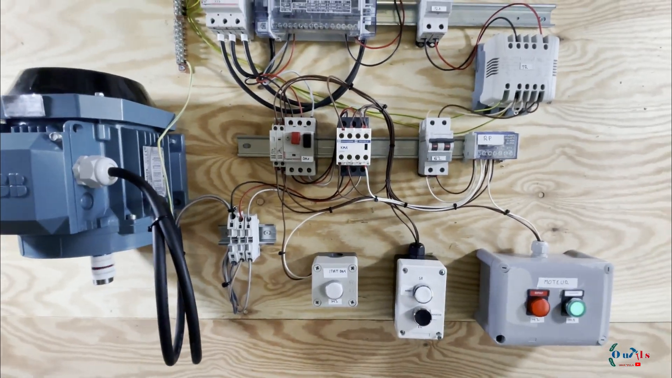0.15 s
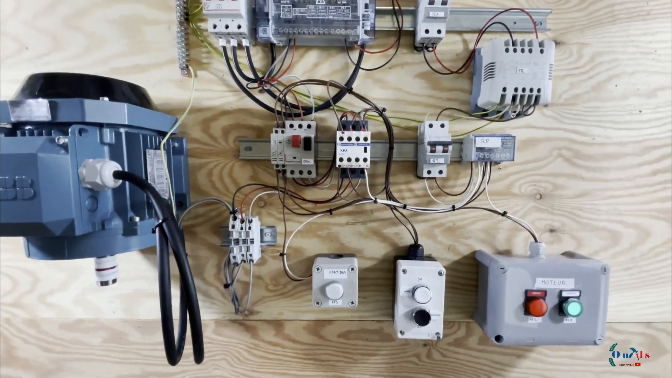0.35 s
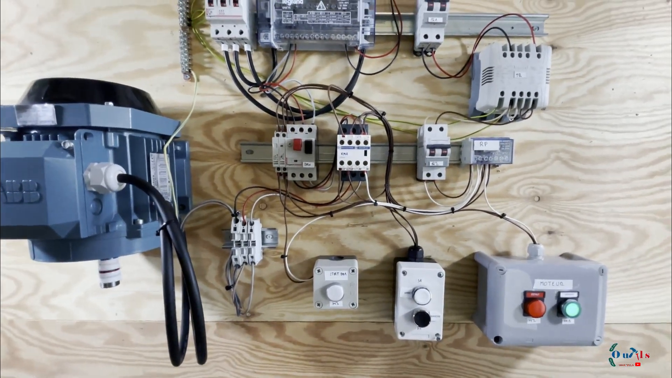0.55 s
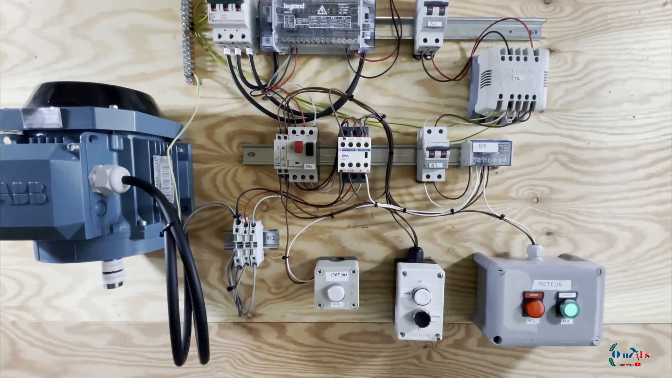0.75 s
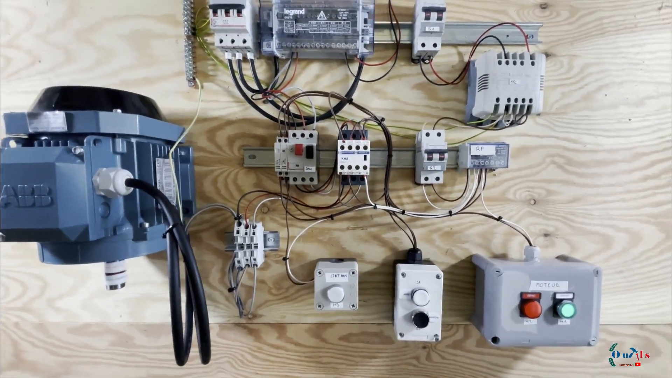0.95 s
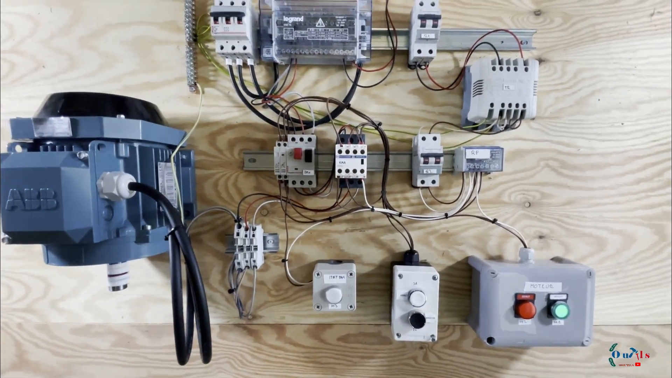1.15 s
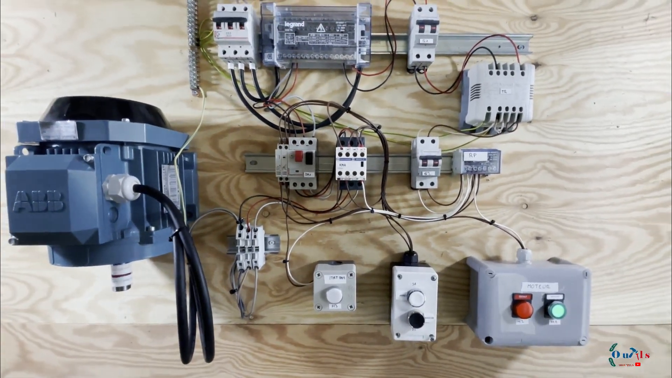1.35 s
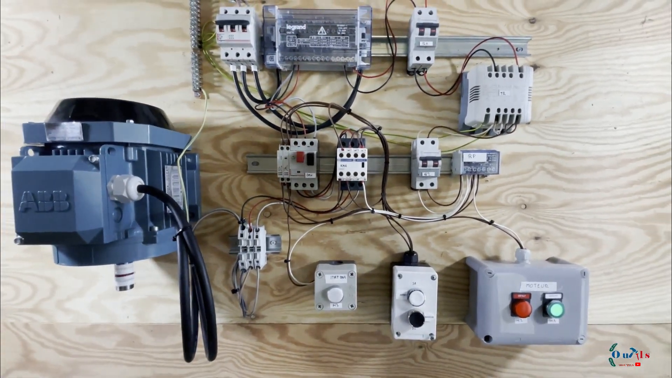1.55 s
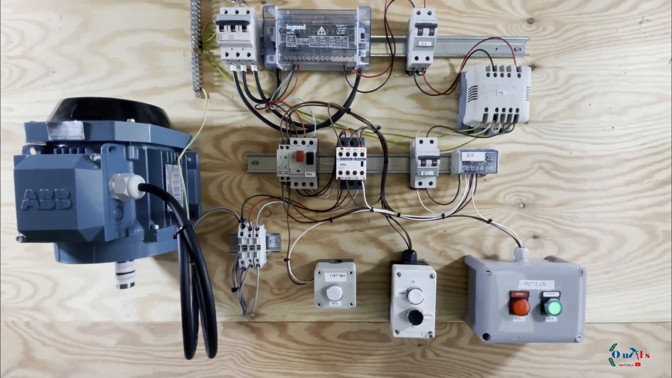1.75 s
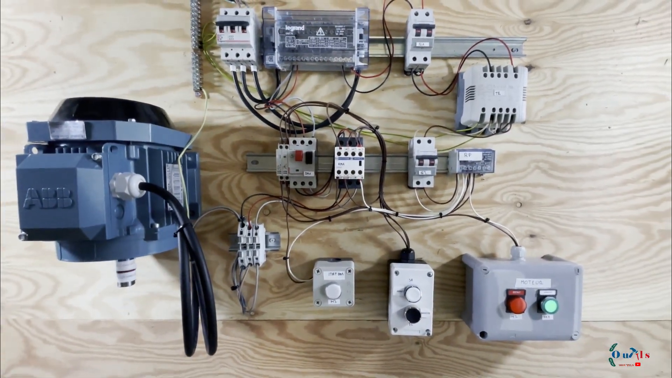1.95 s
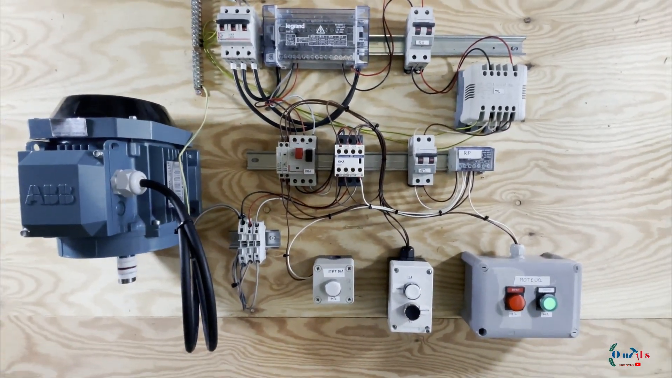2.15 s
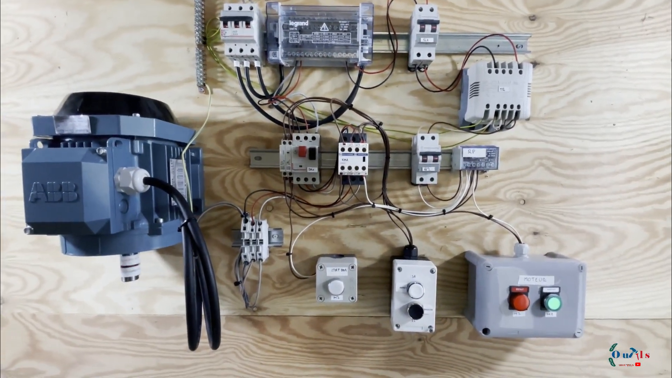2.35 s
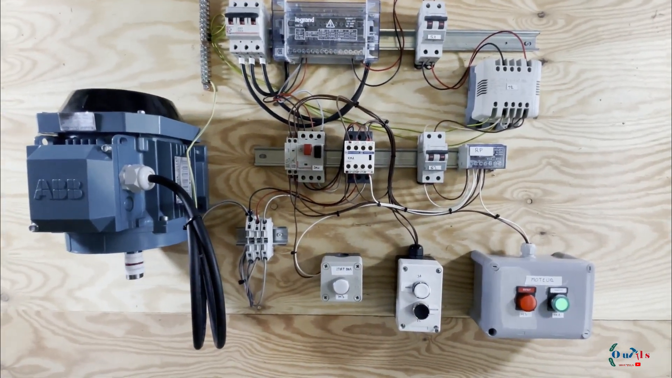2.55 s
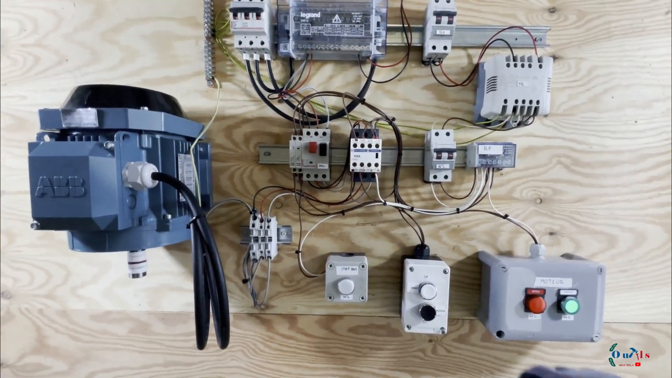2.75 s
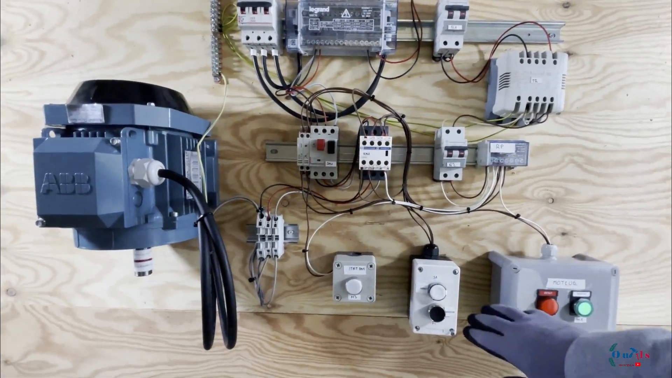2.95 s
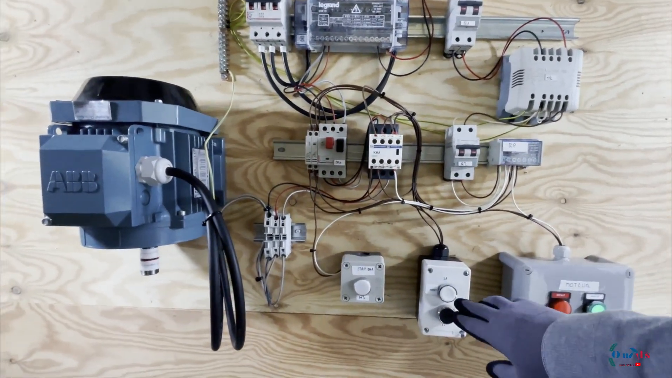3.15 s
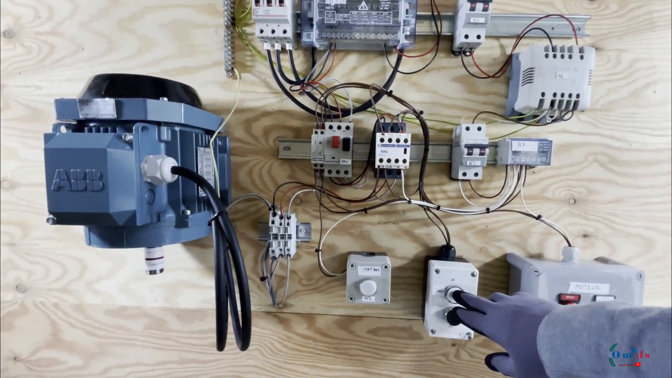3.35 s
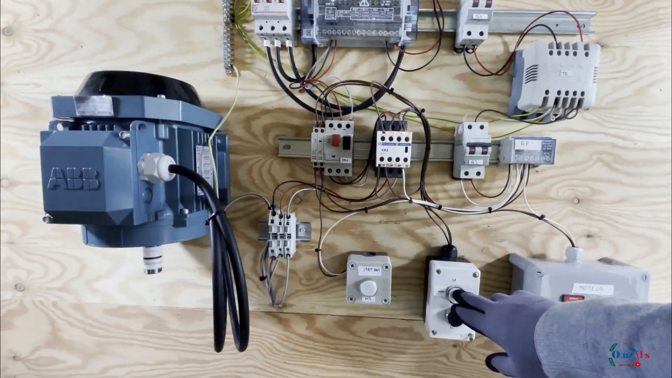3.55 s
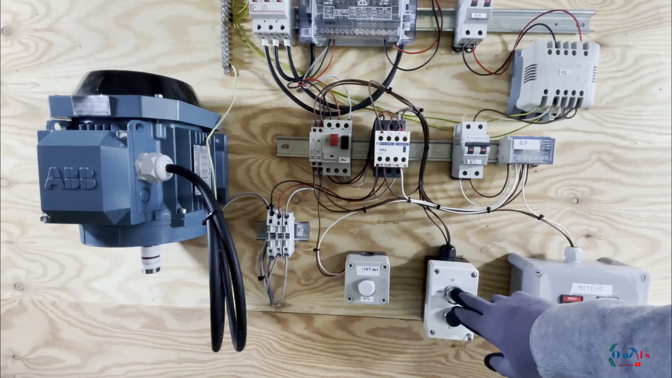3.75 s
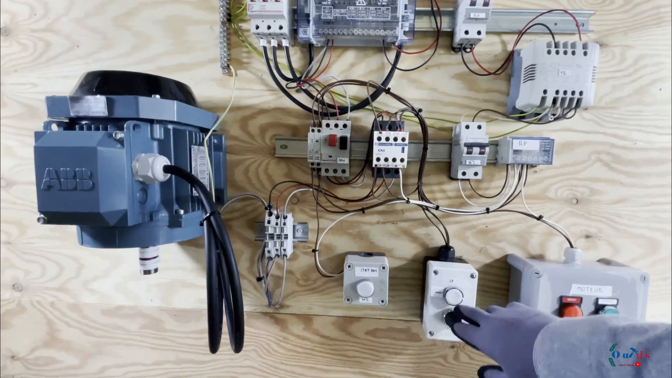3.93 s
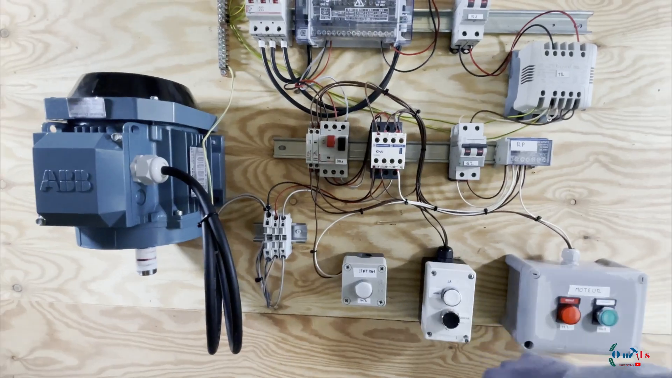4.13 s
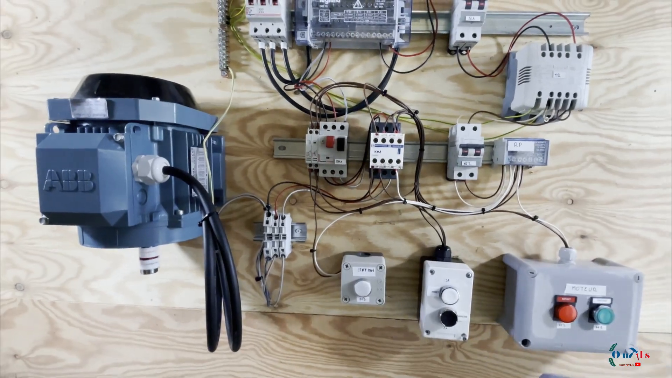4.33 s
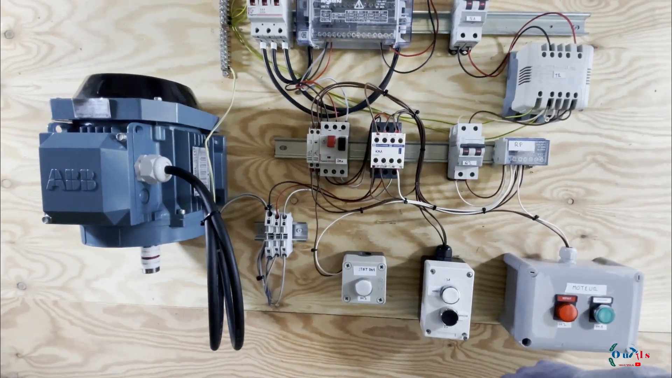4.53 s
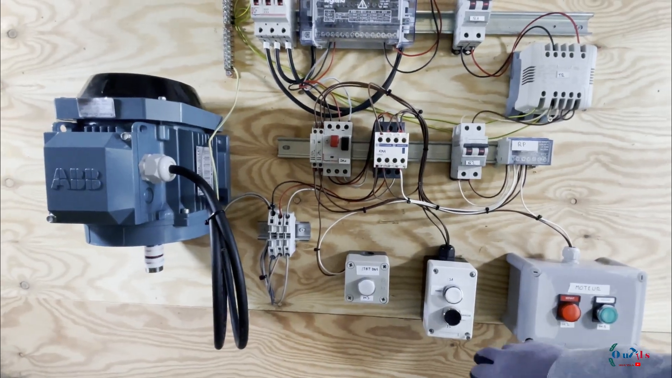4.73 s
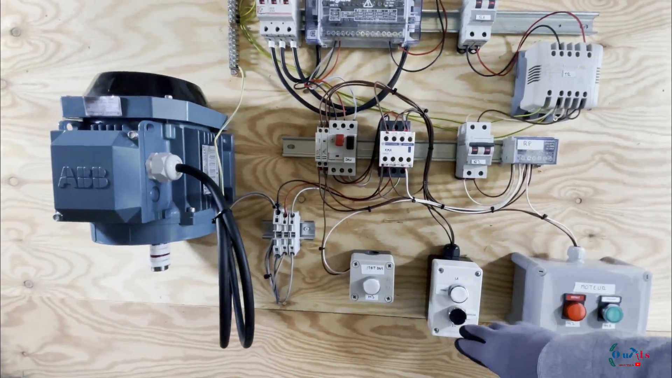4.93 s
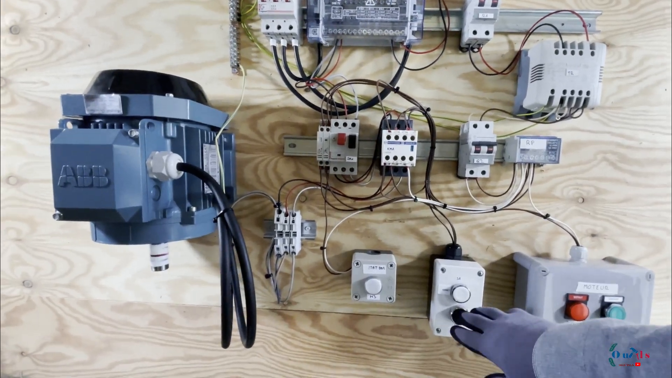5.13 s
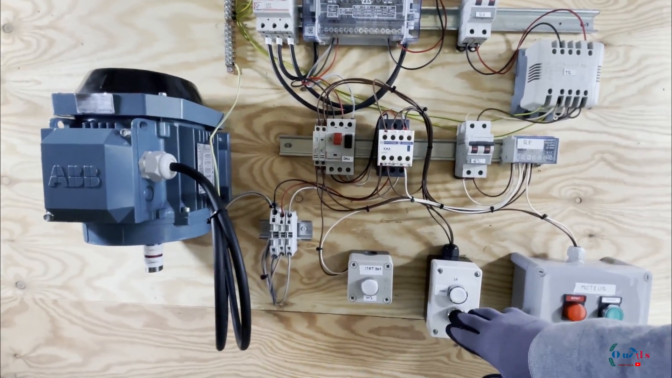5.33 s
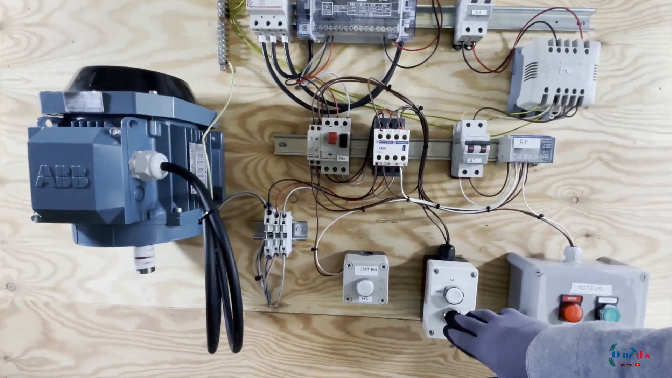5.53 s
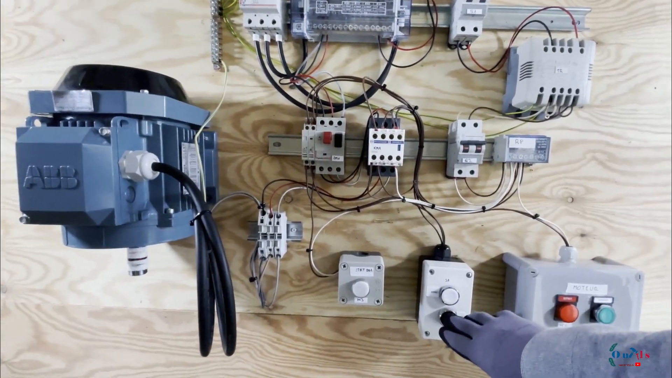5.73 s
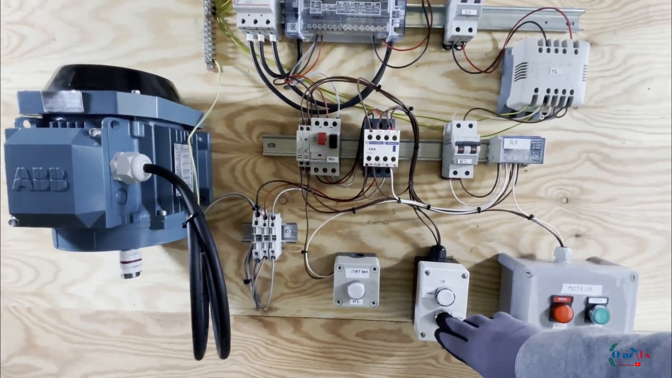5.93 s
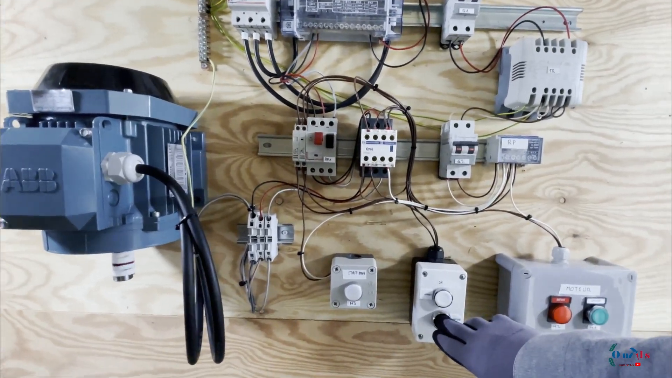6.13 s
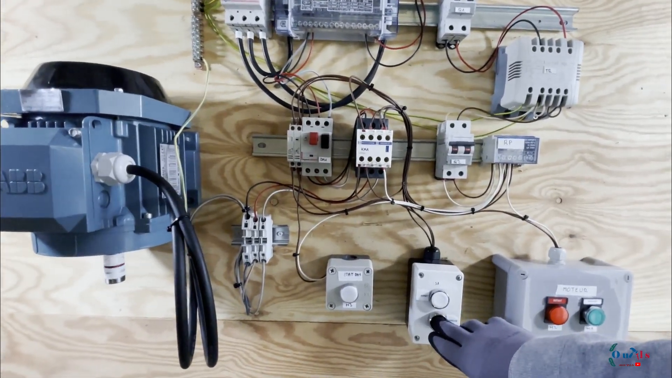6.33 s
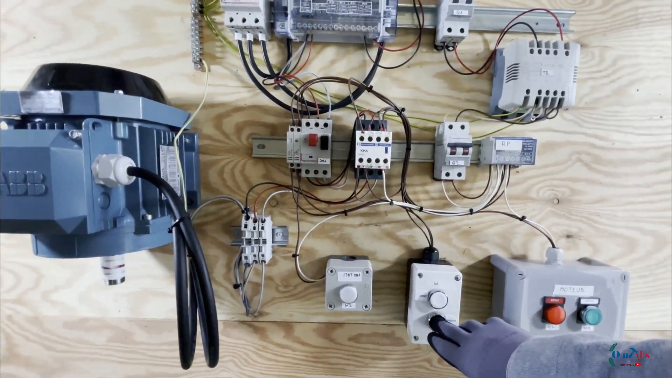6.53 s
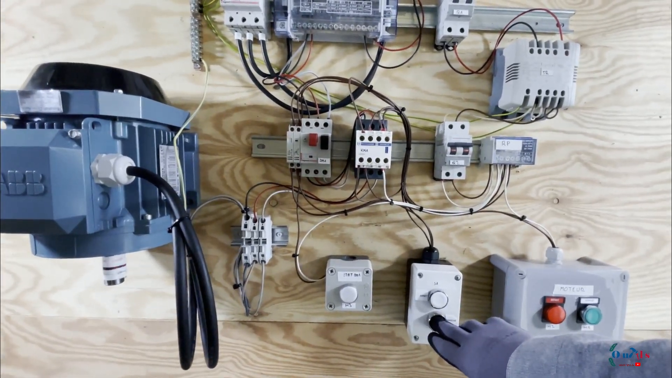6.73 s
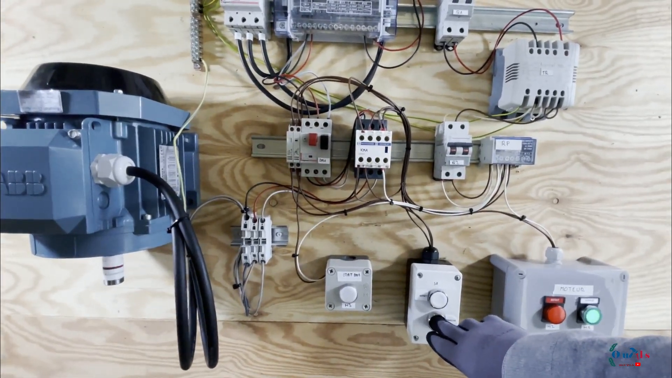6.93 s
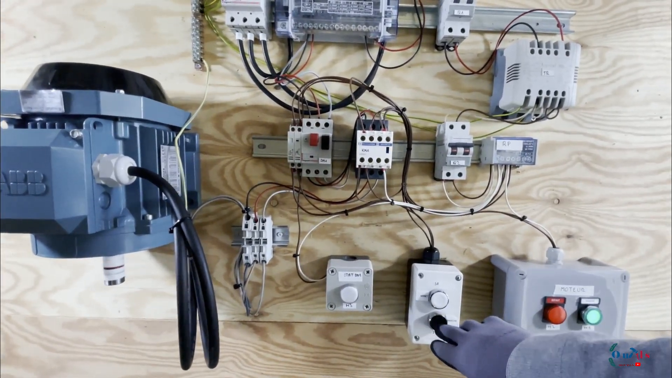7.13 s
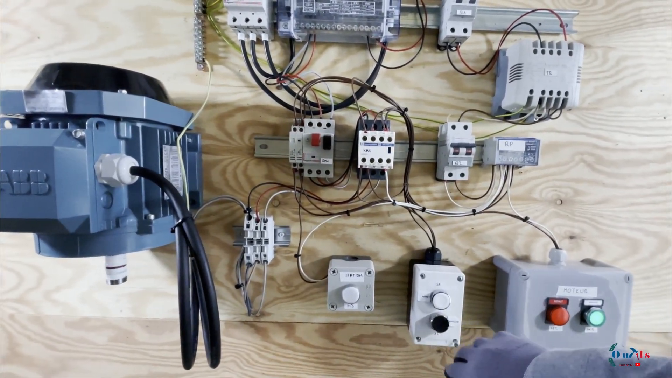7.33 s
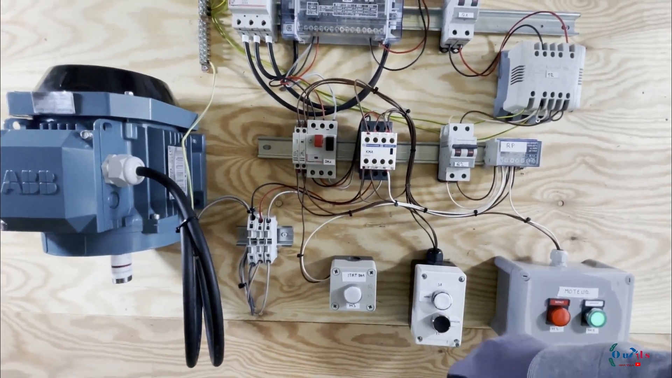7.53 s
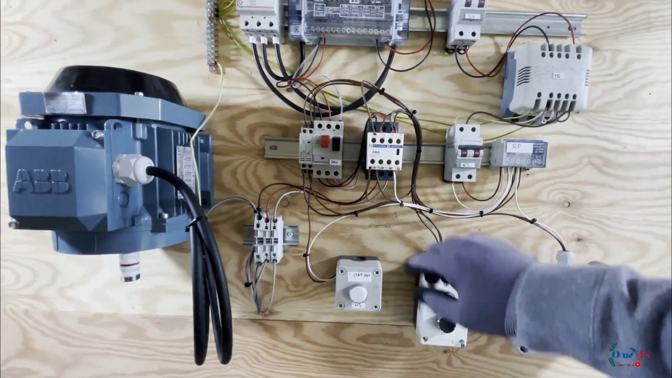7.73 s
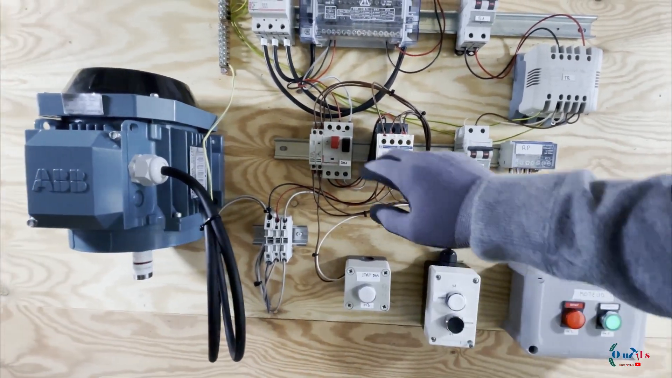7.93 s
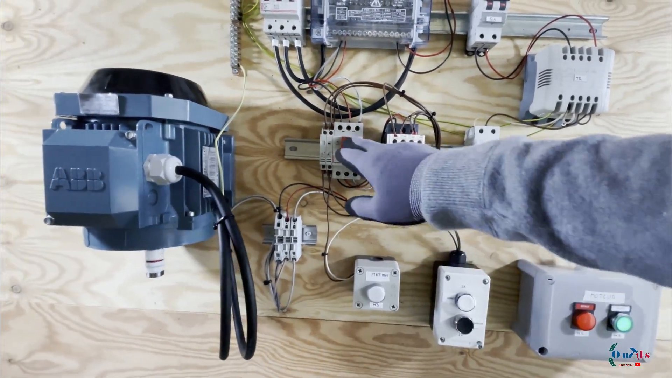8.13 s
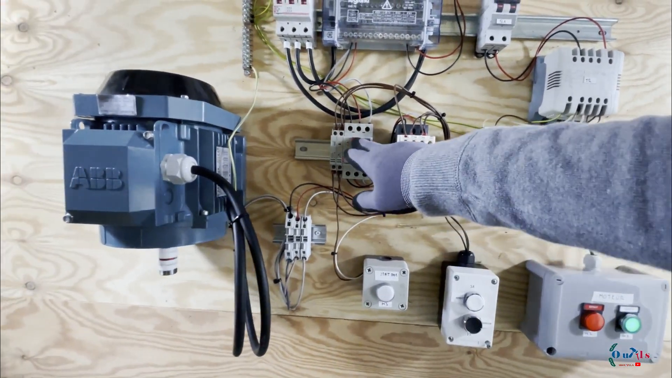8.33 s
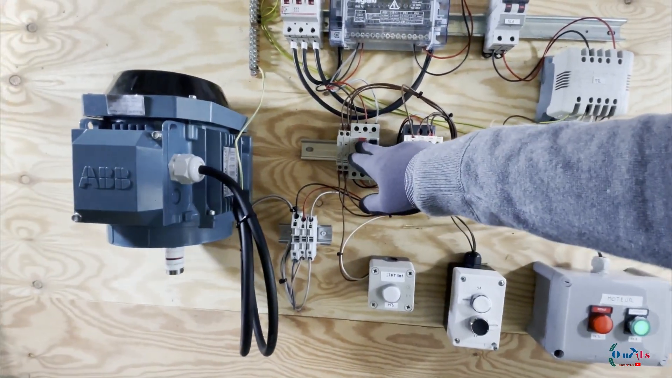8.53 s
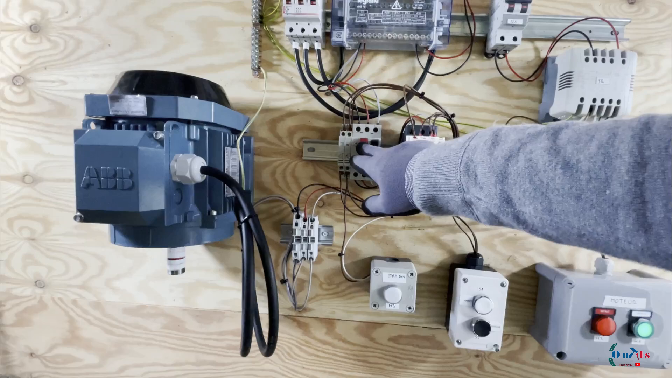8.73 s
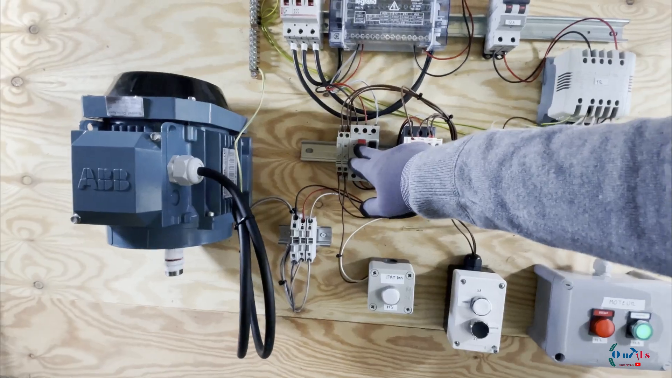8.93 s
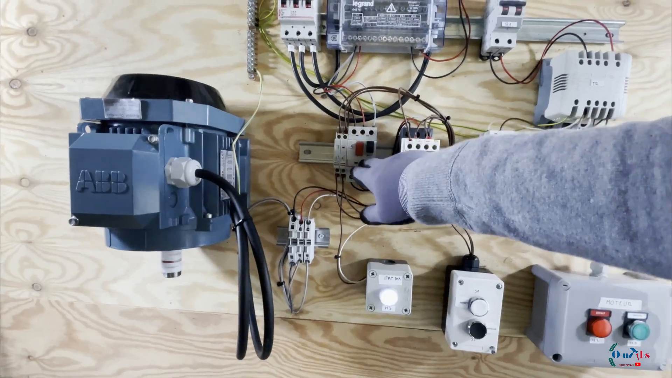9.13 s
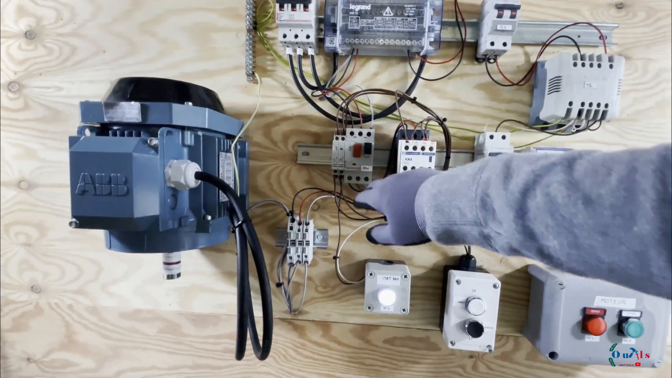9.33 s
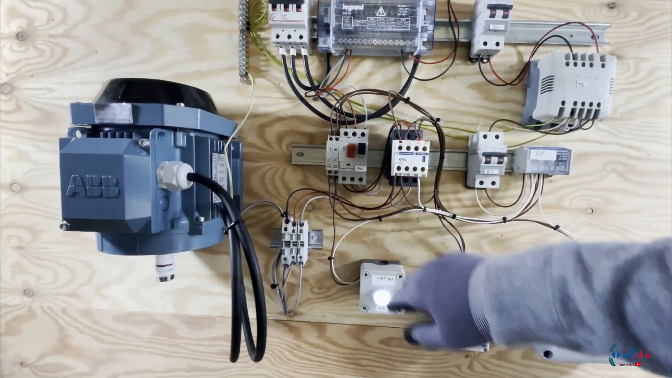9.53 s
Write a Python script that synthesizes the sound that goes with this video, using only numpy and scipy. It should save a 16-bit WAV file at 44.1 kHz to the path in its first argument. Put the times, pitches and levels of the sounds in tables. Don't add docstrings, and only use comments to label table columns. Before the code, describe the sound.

In a workshop, a small electric motor runs with a steady buzzing hum and fan whirr. A very loud, sharp contactor clack with a bench thud stops the buzz, and the whirr slowly glides down. Soft button ticks and low handling rumbles follow. Another clack restarts it with a growling surge and rattling wooden thumps, it runs briefly, then a last clack trips it into coasting. Close handheld phone microphone, short room reverberation.

```python
import sys
import numpy as np
from scipy import signal
from scipy.fft import rfft, irfft
from scipy.io import wavfile
from scipy.ndimage import uniform_filter1d

SR = 44100
rng = np.random.default_rng(int(sys.argv[2]) if len(sys.argv) > 2 else 0)


def unload_audio(sound):
    columns = np.transpose(np.atleast_2d(sound))
    steps = np.round(np.clip(columns, -1, 1) * 32767)
    wavfile.write(sys.argv[1], SR, steps.astype(np.int16))


def gain_from_decibels(decibels):
    exponent = np.asarray(decibels, float) / 20
    return 10 ** exponent


N = 422478
TIME = np.arange(N) / SR
HZ = np.arange(N // 2 + 1) * SR / N
SIDES = np.array([[.5], [-.5]])

SHAFT_HZ = 24.975
CUT_S, START_S, TRIP_S = 3.73, 6.98, 9.075
COAST_S, RUN_UP_S = 5.5, .22
ARC_S, LOCK_S = .012, 0.052
INRUSH_RISE_S, INRUSH_HOLD_S, INRUSH_FALL_S = 0.066, 0.13, 0.035
MOTOR_LAG, CLACK_LAG, STEEL_LAG = -13, -4, -3

LINE_ORDERS = (3, 4, 5, 7, 8, 9, 11, 12, 26, 30, 34, 35, 38, 56, 70, 74, 82, 104, 130, 178)
# first_run_db, second_run_db, left_minus_right_db
LINE_LEVELS = [(-75, -56, 11), (-35.5, -34, 1), (-39.5, -39.5, 1), (-47, -45.5, 3), (-41, -43, 3.5),
               (-52.5, -47.5, -7.5), (-48.5, -45, 3.5), (-40.5, -44, -3.5), (-51, -53, 12.5),
               (-49.5, -46.5, 10), (-34, -31.5, -8), (-40, -38, 2), (-45, -46, -6.5), (-49, -48, 11),
               (-46.5, -49.5, 19), (-38.5, -68.5, 9.5), (-51, -48, 1), (-54, -66, 6), (-46.5, -52, 7.5),
               (-52.5, -53, 11.5)]
BALL_ORDERS = (78, 87, 90, 97, 106)
# pitch_hz, width_hz, buzz_db, whirr_db, left_minus_right_db
FRAME_MODES = [(110, 190, -15, -31.5, -20), (301, 149, -2.5, -7.5, -0.5), (478.4, 105, -13.5, -21.5, 7),
               (706.7, 164, -4, -19, 11.5), (843, 206, -0.5, -29, 3.5), (1480, 440, -3, -13, 6),
               (1837, 177, -24, -2.5, -0.5), (2115, 257, -7.5, -11, 2.5), (2781, 566, -11, -42, 5),
               (3390, 365, -11, -12.5, 5.5), (3927, 562, -9, -12.5, 5), (4500, 820, -15, -37, 9.5),
               (5500, 1667, -17.5, -32.5, 11.5), (7120, 333, -22.5, -27, 7), (8770, 900, -14.5, -22.5, 0.5),
               (10000, 1500, -34, -54.5, -10), (11850, 720, -9, -48, 11.5)]
# pitch_hz, correlation (0..1)
PORT_COHERENCE = [(60, 0.998), (200, 0.86), (550, 0.24), (800, 0.378), (1400, 0.624), (2100, 0.72),
                  (3000, 0.25), (7500, 0.17), (9000, 0.06), (16000, 0.4)]
# time_s, nearness_db
PHONE_NEARNESS = [(0, .5), (1.2, .5), (2.2, -.5), (3.7, 0), (5.2, 1.5), (6.3, -1), (7.4, -1.5), (8.2, 0),
                  (9.58, 1)]
# powered_db, coasting_db (full speed), loss_per_halving_db, inrush_db, settling_s
BUZZ, WHIRR = (-32, -36, 16.5, -24, 0.192), (-36.5, -36, 6.5, -44, .08)

# pitch_hz, width_hz, level_db
BOARD_MODES = [(71, 22, -0.5), (100, 30, -1), (140, 39, -3.5), (201, 49, -10)]
# pitch_hz, width_hz, level_db
BOOM_MODES = [(49.74, 23, 0)]
# powered_db, coasting_db
BOARD_DB, BOOM_DB = (-40.5, -39), (-48.5, -45.5)
# peak_s, rise_s (per 10 dB), fall_s (per 10 dB), board_db, boom_db
SWELLS = [(0, .1, 1., -35, -46), (3.6, 0.49, 0.1, -37, -50.5), (3.88, .12, 0.1, -33, -38.5),
          (4.65, 0.63, 0.1, -36, -43), (5.47, 0.14, .5, -30.5, -28.5), (5.8, 0.38, .5, -35.5, -31),
          (6.5, .2, 0.94, -43, -42), (7.05, 0.067, .5, -20, -36), (7.2, .1, 0.0033, -18.5, -33),
          (7.5, .2, .9, -36, -34), (8.8, .3, 1, -38.5, -36), (9.13, 0.2, 0.11, -26, -42.5)]
# start_s, peak_db, board_hz, clank_db, clank_centre_hz
BLOWS = [(3.727, -9, 134.5, -28, 800), (3.775, -10, 119.5, -40, 250), (3.839, -20, 132.6, -48, 250),
         (6.963, -13, 162, -27, 260), (6.988, -11, 88, -24.5, 870), (7.03, -17, 83.4, -27, 300),
         (7.073, -7.5, 135, -31, 600), (7.09, -7, 109.6, -27, 900), (7.1, -12.5, 200, -16, 380),
         (7.122, -7, 98.4, -24, 620), (7.143, -4.5, 131.3, -18, 260), (7.168, -4, 98.5, -18.5, 260),
         (7.204, -8, 85, -24, 250), (7.239, -7, 136, -30, 210), (9.072, -18, 184.6, -31, 600),
         (9.103, -12, 133, -33, 250), (9.124, -14.5, 119, -42, 250), (9.154, -16, 140, -48, 250)]
# pitch_hz, t60_s, level_db
CLANK_MODES = [(200, .08, -2), (235, .08, -3), (272.4, 0.098, -1), (322.9, 0.076, -3.5), (418, 0.054, -2.5),
               (560, 0.041, -3.5), (727, .06, -1.5), (812, .1, -2.5), (885, 0.095, -0.5),
               (955.5, 0.043, -8.5), (1060, 0.045, -7.5)]
# start_s, peak_db, pitch_hz, t60_s
SWAYS = [
    (3.8, -22.5, 70.16, 0.516),
    (7.271, -23.5, 68.2, 2.57),
    (9.112, -24, 62.8, 0.99),
]
# start_s, end_s, pitch_hz, level_db
FAR_MACHINES = [
    (4.2, 5.4, 398.6, -55),
    (5.05, 5.35, 331.4, -47.5),
    (6.05, 6.96, 297.6, -51),
    (6.3, 6.95, 198.3, -61),
]

# start_s, level_db, rattle_s, knock_db, brightest_hz
CLACKS = [(3.7218, -2.5, 0.0037, -15.5, 6500), (3.7283, -2, 0.00363, 3, 4800),
          (5.375, -33, 0.063, -30, 1000), (5.38, -40, 0.066, -14, 2100), (6.9643, -14, 0.0034, -25, 9000),
          (6.9693, -2.5, .004, -15, 5850), (6.9735, -2.5, 0.0053, -10, 6900), (7.148, -23, .008, -14, 7000),
          (7.166, -24, 0.0066, -16, 6000), (9.0636, 1, 0.009, -11, 6360), (9.077, -14.5, .006, -8, 5500),
          (9.085, -5.5, 0.0038, 0, 4000)]
# start_s, level_db, brightest_hz, left_minus_right_db
TICKS = [(3.9113, -24.5, 4300, 0), (3.929, -26.5, 3000, -4), (5.72, -51, 9000, 0), (5.834, -48, 6000, 0),
         (5.955, -41, 6200, 7), (6.177, -45, 6000, 2), (6.347, -50.5, 8000, 3), (6.484, -41, 5000, 2),
         (6.522, -45.5, 6000, 0), (6.871, -38, 4000, 6)]
# pitch_hz, t60_s, level_db
STEEL_MODES = [(2500, .002, -6), (3100, .002, -5), (3800, .002, -5), (4600, .0016, -5), (5500, .0015, -6),
               (6500, .0015, -5), (7600, .0015, -5), (8800, .0015, -5), (10300, .0015, -7),
               (11600, .002, -12), (14500, .002, -27)]
# pitch_hz, t60_s, level_db
HOUSING_MODES = [(1800, 0.0086, -12), (2050, 0.0051, -4), (2560, 0.0034, -14.5)]
# pitch_hz, t60_s, level_db
ROOM_BANDS = [(690, 0.33, -11.5), (1900, 0.53, -28.5), (4000, 0.52, -28), (6420, 0.465, -23.5),
              (9500, .35, -33)]
# low_hz, high_hz, level_db (at usual treble), slope (dB per dB of treble)
HISS_BANDS = [(10966, 11650, -68.5, 1.05), (10300, 11400, -89, 1.55)]


def unit(x):
    return x / np.sqrt(np.mean(x ** 2))


def walk(rate):
    k = int(SR / rate)
    held = np.repeat(rng.standard_normal(N // k + 1), k)
    return 1.43 * uniform_filter1d(uniform_filter1d(held, k), k)[:N]


def since(s):
    return np.maximum(TIME - s, 0)


def bandpass(order, low_hz, high_hz, x):
    return signal.sosfilt(signal.butter(order, [low_hz, high_hz], "bandpass", fs=SR, output="sos"), x)


def highpass(order, low_hz, x):
    return signal.sosfilt(signal.butter(order, low_hz, "highpass", fs=SR, output="sos"), x)


def add(out, s, x):
    i = int(s * SR)
    out[..., i:i + x.shape[-1]] += x[..., :N - i]


def shaft_speed():
    up = np.clip(since(START_S) / RUN_UP_S, 0, 1)
    first_coast = 1 / (1 + since(CUT_S) / COAST_S)
    return ((1 - up) * first_coast + up) / (1 + since(TRIP_S) / COAST_S)


def powered(fall_s, rise_s):
    again = np.clip(since(START_S + RUN_UP_S - rise_s) / rise_s, 0, 1) ** 2
    return np.maximum(np.exp(-since(CUT_S) / fall_s), again * np.exp(-since(TRIP_S) / fall_s))


def near_db():
    return np.interp(TIME, *np.transpose(PHONE_NEARNESS))


def resonances(rows, skirt=1.32):
    power = 0
    for hz, width, db, pan_db in rows:
        power = power + gain_from_decibels(2 * (db + pan_db * SIDES)) / (1 + (2 * (HZ - hz) / width) ** 2) ** skirt
    return np.sqrt(power)


def ports(shared, gain):
    hz, correlation = np.transpose(PORT_COHERENCE)
    like = np.interp(np.log(HZ + 1), np.log(hz), correlation)
    direct = rfft(np.array([np.roll(shared, MOTOR_LAG), shared]))
    own = rfft(rng.standard_normal((2, N)))
    return unit(irfft(gain * (np.sqrt(like) * direct + np.sqrt(1 - like) * own), N))


def magnetic_lines(turns):
    out, second_run = 0, TIME > 5
    for order, (first_db, second_db, pan_db) in zip(LINE_ORDERS, LINE_LEVELS):
        lag = 2 * np.pi * order * SHAFT_HZ * MOTOR_LAG / SR * (SIDES + .5)
        db = np.where(second_run, second_db, first_db) + 1.07 * walk(4.6) + pan_db * SIDES
        phase = 2 * np.pi * (order * turns + rng.random())
        out = out + np.sqrt(2) * gain_from_decibels(db) * np.sin(phase - lag)
    return out * gain_from_decibels(near_db()) * powered(ARC_S, LOCK_S)


def bearings(turns, speed):
    hz, width, shield_db = 1800, 237, -45.5
    out = 0
    for order in BALL_ORDERS:
        response = 1 / (1 + (2 * (order * SHAFT_HZ * speed - hz) / width) ** 2)
        level = gain_from_decibels(shield_db + 2.0 * walk(4.54)) * speed ** 2
        out = out + level * response * np.sin(2 * np.pi * order * turns)
    return out


def motor_gain(speed, on_db, coast_db, loss_db, inrush_db, settle_s):
    surge_end_s = START_S + INRUSH_RISE_S + INRUSH_HOLD_S
    surge = np.minimum(since(START_S) / INRUSH_RISE_S, 1) * np.exp(-since(surge_end_s) / INRUSH_FALL_S)
    running = gain_from_decibels(on_db) * powered(settle_s, LOCK_S)
    coasting = gain_from_decibels(coast_db + loss_db * np.log2(speed))
    inrush = gain_from_decibels(inrush_db) * surge
    return gain_from_decibels(near_db()) * np.sqrt(running ** 2 + coasting ** 2 + inrush ** 2)


def motor():
    speed = shaft_speed()
    turns = np.cumsum(SHAFT_HZ * speed) / SR
    out = magnetic_lines(turns) + bearings(turns, speed)
    for column, layer, repeat in ((2, BUZZ, .2), (3, WHIRR, .3)):
        track = rng.standard_normal(1766)
        turning = unit(np.interp(turns % 1, np.linspace(0, 1, len(track)), track))
        force = np.sqrt(repeat) * turning + np.sqrt(1 - repeat) * rng.standard_normal(N)
        gain = resonances([(r[0], r[1], r[column], r[4]) for r in FRAME_MODES])
        gain = gain / np.sqrt(1 + (HZ / 10900) ** 80)
        flutter = gain_from_decibels(.5 * walk(2.96) + 0.63 * walk(20))
        out = out + motor_gain(speed, *layer) * flutter * ports(force, gain)
    return out


def rumble_gain(steady_db, column):
    on = powered(.1, .1)
    power = gain_from_decibels(2 * (on * steady_db[0] + (1 - on) * steady_db[1]))
    for row in SWELLS:
        s, rise, fall = row[:3]
        drop_db = 10 * np.maximum((s - TIME) / rise, (TIME - s) / fall)
        power = power + gain_from_decibels(2 * (row[column] - drop_db))
    return np.sqrt(power)


def ring(hz, t60, length):
    t = np.arange(int(length * SR)) / SR
    return np.sin(2 * np.pi * hz * t) * np.exp(-np.log(1000) * t / t60)


def swing(hz, t60, push=0.47):
    x = ring(hz, t60, max(t60, .3))
    x = x * (1 - np.exp(-np.arange(len(x)) * hz / SR / push))
    return x / np.abs(x).max()


def bench():
    out = 0
    for modes, steady_db, column in ((BOARD_MODES, BOARD_DB, 3), (BOOM_MODES, BOOM_DB, 4)):
        gain = resonances([(*row, 1.2) for row in modes], skirt=2.04)
        level = rumble_gain(steady_db, column) * gain_from_decibels(2.0 * walk(14))
        out = out + level * ports(rng.standard_normal(N), gain)
    clank = np.array([gain_from_decibels(db) * swing(hz, t60, push=4.55) for hz, t60, db in CLANK_MODES])
    clank_hz = np.array(CLANK_MODES)[:, 0]
    for s, db, hz, clank_db, centre_hz in BLOWS:
        mix = rng.standard_normal(len(clank))
        off_db = 18 * np.log2(clank_hz / centre_hz) ** 2
        frame = (np.sign(mix[::-1]) * gain_from_decibels(clank_db - off_db + 2.5 * mix)) @ clank
        add(out, s, gain_from_decibels(1.4 * SIDES) * (gain_from_decibels(db) * swing(hz, .1) + frame))
    for s, db, hz, t60 in SWAYS:
        add(out, s, gain_from_decibels(db + 1.02 * SIDES) * swing(hz, t60))
    for start, end, hz, db in FAR_MACHINES:
        fade = np.clip(np.minimum(TIME - start, end - TIME) / 0.064, 0, 1)
        out += gain_from_decibels(db + 2 * walk(5.1)) * fade * np.sin(2 * np.pi * hz * TIME)
    return out


def clack(rattle, knock_db, bright_hz, spread_db):
    chance = rng.standard_normal((3, 6000))
    t = np.arange(6000) / SR / rattle
    shape = np.minimum(t / 0.43, 1) ** 0.83 * np.exp(-np.maximum(t - .9, 0) / 0.6)
    impacts = shape * (chance[0] + chance[1:])
    steel = gain_from_decibels(-6) * ring(bright_hz, .003, .03)
    for k, (hz, t60, db) in enumerate(STEEL_MODES):
        off_db = spread_db * np.log2(hz / bright_hz) ** 2
        scattered_hz = hz * (1 + .04 * chance[0, k])
        steel = steel + (-1) ** k * gain_from_decibels(db - off_db) * ring(scattered_hz, t60, .03)
    housing = 0
    for k, (hz, t60, db) in enumerate(HOUSING_MODES):
        housing = housing + (-1) ** k * gain_from_decibels(db + knock_db) * ring(hz, t60, .03)
    knock = signal.fftconvolve(impacts, housing[None], axes=1)
    knock[0] = np.roll(knock[0], CLACK_LAG)
    x = signal.fftconvolve(impacts, steel[None], axes=1)
    x[0] = np.roll(x[0], STEEL_LAG)
    x = x + knock
    return x / np.abs(x).max()


def clacks():
    out = np.zeros((2, N))
    events = [(*row, 3.5) for row in CLACKS]
    events += [(s, db, 0.0033, -16.5, hz, pan_db) for s, db, hz, pan_db in TICKS]
    for s, db, rattle, knock_db, bright_hz, pan_db in events:
        spread_db = 1.6 if db > -20 else 14
        add(out, s, gain_from_decibels(db + 8.0 + pan_db * SIDES) * clack(rattle, knock_db, bright_hz, spread_db))
    return out


def room(x):
    t, tail = np.arange(SR) / SR, 0
    lowpass = signal.butter(10, 12300, fs=SR, output="sos")
    noise = signal.sosfilt(lowpass, rng.standard_normal((2, N)))
    for hz, t60, db in ROOM_BANDS:
        low_hz, high_hz = hz / 1.4, hz * 1.4
        decay = np.exp(-np.log(1000) * t / t60) * np.minimum(t / 0.0013, 1)
        energy = signal.oaconvolve(bandpass(2, low_hz, high_hz, x[0]) ** 2, decay ** 2)[:N]
        diffuse = unit(bandpass(2, low_hz, high_hz, noise))
        tail = tail + gain_from_decibels(db - 15.5) * np.sqrt(np.abs(energy)) * diffuse
    return tail


def scene():
    hits = highpass(2, 1300, clacks())
    hz, width, db = 6500, 3300, -5
    shade = gain_from_decibels(db * (.5 - SIDES) * np.exp(-(2 * (HZ - hz) / width) ** 4))
    return motor() + bench() + irfft(shade * rfft(hits + room(hits)), N)


def hiss(x):
    treble = bandpass(2, 5000, 9000, x)
    usual_db = -43.5
    treble_db = 10 * np.log10(uniform_filter1d(treble ** 2, size=900) + 1e-9) - usual_db
    fade_db = -10 * np.minimum(since(8.05) / 0.23, 1)
    out = 0
    for low_hz, high_hz, db, slope in HISS_BANDS:
        level_db = np.minimum(db + slope * treble_db + fade_db, -42)
        noise = unit(bandpass(4, low_hz, high_hz, rng.standard_normal(N)))
        out = out + gain_from_decibels(level_db + 3.8 * walk(15)) * noise
    return out


def band_limit(x):
    return signal.sosfilt(signal.butter(12, 16610, fs=SR, output="sos"), x)


def record(dry):
    spectrum = rfft(highpass(4, 42, dry)) / np.sqrt(1 + (HZ / 12000) ** 16)
    centre = spectrum.mean(axis=0)

    def gap(top_hz):
        edge = np.minimum(HZ - 9600, top_hz - HZ) / 150 + .5
        return irfft(np.clip(edge, 0, 1) * centre, N)

    always = gap(11000)
    quiet = gap(12000) - always
    open_db = -56
    shut = 1 / (1 + (uniform_filter1d(quiet ** 2, size=400) / gain_from_decibels(2 * open_db)) ** 2)
    mix = irfft(spectrum, N) - 0.883 * (always + shut * quiet) + hiss(dry[0])
    return band_limit(np.clip(mix, -1, 1))


dry = scene()
out = record(dry)
unload_audio(out)
```